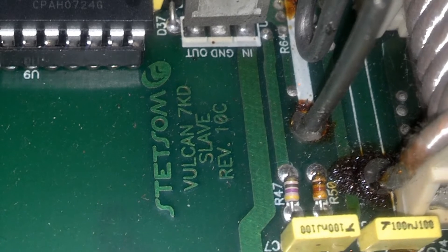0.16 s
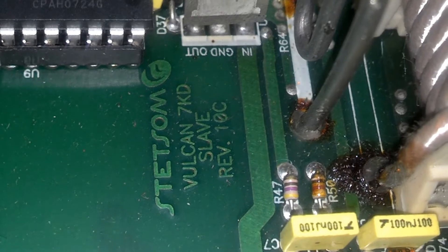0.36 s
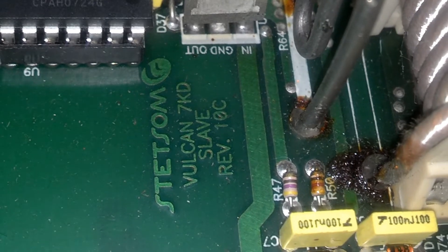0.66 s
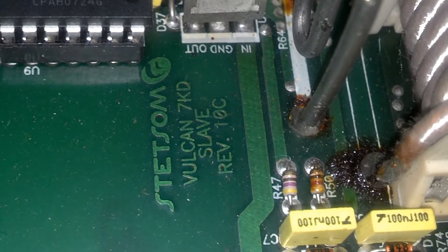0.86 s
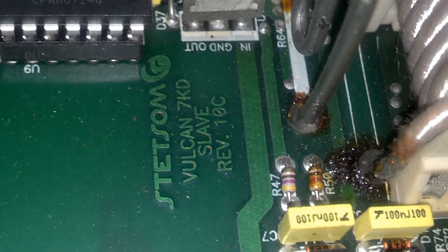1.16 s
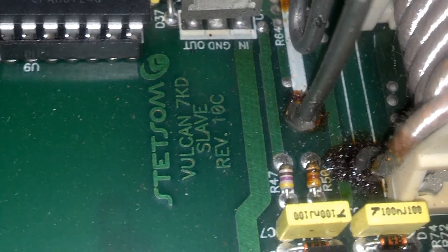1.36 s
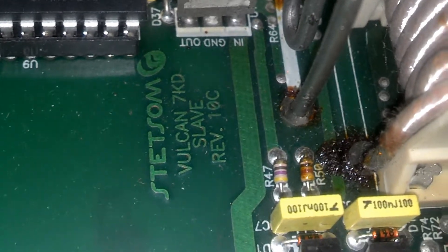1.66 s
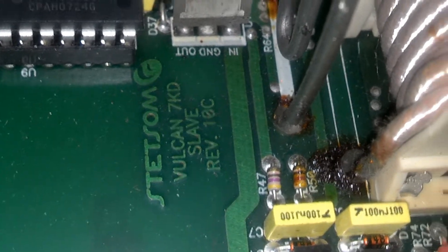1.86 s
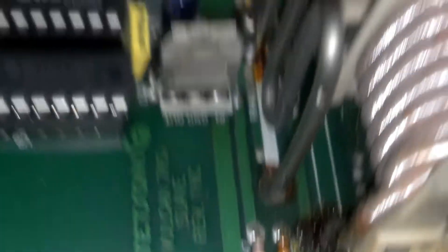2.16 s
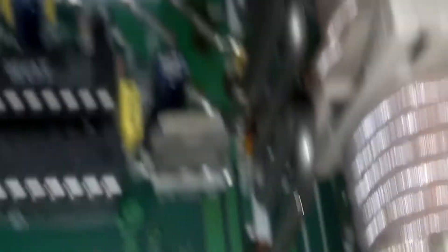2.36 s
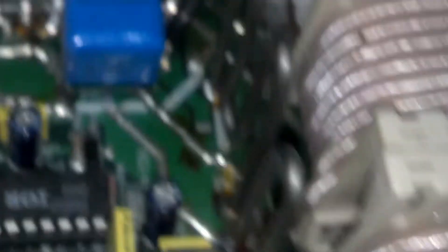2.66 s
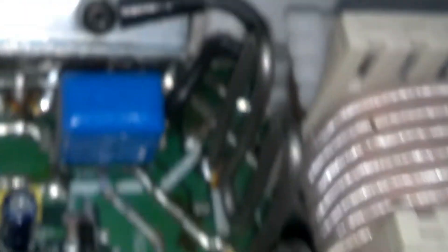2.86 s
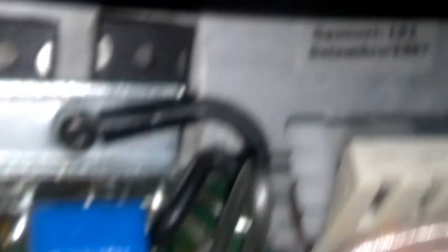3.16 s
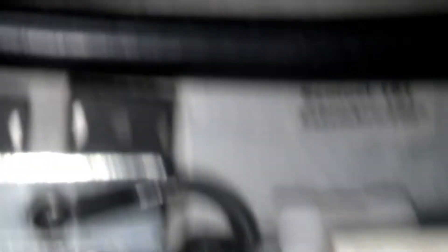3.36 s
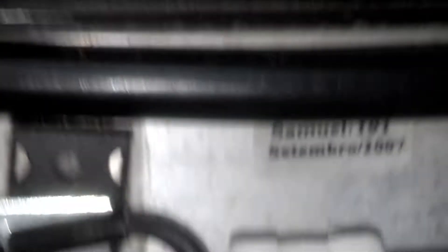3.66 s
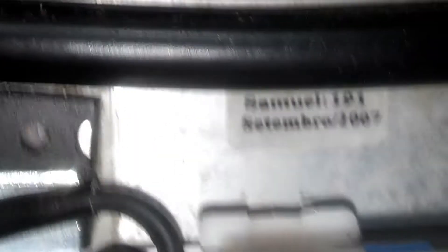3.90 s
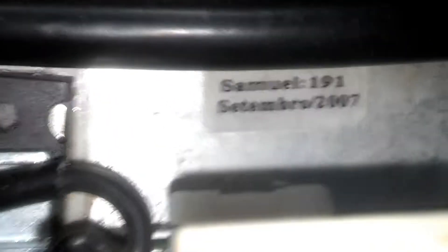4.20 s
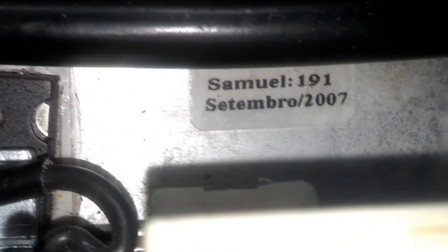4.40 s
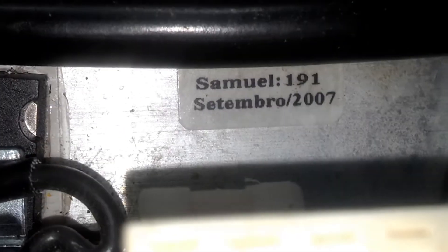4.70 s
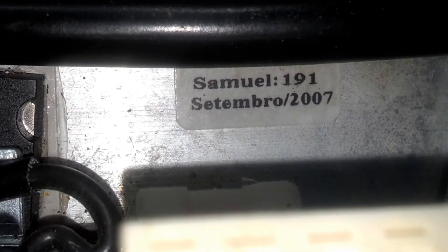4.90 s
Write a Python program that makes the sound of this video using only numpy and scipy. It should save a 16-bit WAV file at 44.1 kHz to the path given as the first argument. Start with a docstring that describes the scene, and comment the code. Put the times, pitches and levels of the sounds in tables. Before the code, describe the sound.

A steady low electrical hum and thin high whine indoors, with sharp handling clicks, soft thumps and brief finger rubs on a phone case.

```python
"""Workshop: a phone is held over a circuit board; a motor and a transformer hum, a switching supply whines.
Fingers tap and slide on the case. Air and rubbing are coloured noise; machines are wavering sines;
thumps, scrape grains and short rings are swelling, dying tone bursts; taps are noise bursts plus case
resonances. Two microphone ports are crossed into stereo, and a limiter ducks everything after the
loudest taps."""
import sys
import numpy as np
from scipy import signal
from scipy.fft import rfft, irfft, next_fast_len
from scipy.io import wavfile
from scipy.ndimage import uniform_filter1d

SR = 44100
rng = np.random.default_rng(int(sys.argv[2]) if len(sys.argv) > 2 else 0)


def store_wav(level_fs):
    """Save 16-bit WAV to argv[1]."""
    pcm = np.round(np.clip(np.atleast_2d(level_fs), -1, 1) * 32767)
    wavfile.write(sys.argv[1], SR, pcm.T.astype(np.int16))


N = 222345

# "common" is alike at both ports, "opposite" has opposite sign at each

# room air density re AIR_DB_PER_HZ: f/Hz, common level/dB, opposite level/dB
AIR_COLOUR = [(30, 6, 14), (60, -15, -9), (95, -1, -10), (149, 5.5, -4), (269, 9, -6), (396, 3, -5),
              (645, -9, -14), (790, -11, -13.5), (970, -17, -17.5), (1880, -20, -20.5), (3550, -22, -21),
              (5650, -28, -30), (6530, -17, -19), (9100, -23, -24.5), (15000, -24, -21.5),
              (14600, -27, -27), (15400, -67, -61)]
AIR_DB_PER_HZ = -80.5

# motor orders: multiple of shaft rate [1], common level/dB, opposite level/dB
MOTOR_ORDERS = [(6, -63, -78), (8, -69, -80), (9, -69, -80), (10, -73, -77), (11, -66, -82), (12, -66, -75),
                (13, -79, -86), (27, -88, -70), (56, -87, -92), (58, -77, -79), (59, -73.5, -86),
                (63, -85, -92), (64, -82, -90), (69, -82, -90), (72, -86, -92), (78, -91, -89)]
SHAFT_HZ = 58.73
# motor fade as the phone turns away, before the shares below: t/s, level/dB
FACING = [(0, -1), (.7, 0.5), (2.35, 1.5), (2.6, 1), (3.1, -4.5), (3.8, -5.5), (4.2, -2), (4.5, -2.5),
          (5.04, -6.5)]
FADE_SHARE_PER_ORDER, HUM_FADE_SHARE = 0.022, 0.38
# other steady tones: f/Hz, common level/dB, opposite level/dB
HUM_TONES = [(150, -63, -80), (180, -62, -80), (305, -63, -78), (240, -57, -75), (265.5, -49, -67),
             (398.3, -60, -73), (14828, -88, -86)]
# low drone: t/s, f/Hz, common level/dB
DRONE_TRACK = [(0, 119, -58), (1.6, 119, -62), (2.2, 118.3, -52), (2.9, 119.5, -57), (3.3, 125.5, -53),
               (3.7, 125, -45), (4.05, 124, -57), (4.42, 123.2, -44.5), (4.7, 124.2, -49),
               (5.04, 124.2, -48.5)]

# supply whine pitch: t/s, f/Hz
WHINE_PITCH = [(0, 6266), (.7, 6255), (1.33, 6284), (1.47, 6280), (1.505, 6470), (1.59, 6350), (1.62, 6310),
               (1.81, 6370), (1.85, 6270), (2.06, 6280), (2.35, 6390), (2.46, 6280), (2.7, 6310),
               (3.0, 6510), (3.35, 6650), (3.5, 6638), (3.72, 6150), (3.8, 6140), (3.92, 6300),
               (3.95, 6460), (4.04, 6610), (4.2, 6650), (4.27, 6750), (4.39, 6780), (4.43, 6780),
               (4.52, 6760), (4.57, 6690), (4.79, 6720), (4.82, 6470), (4.96, 6540), (5.04, 6590)]
# whine level on top of its rise with pitch: t/s, level/dB
WHINE_SWELL = [(0, -1.5), (3.0, -1.5), (3.55, 1), (3.75, -2), (3.9, 1), (4.3, -1), (4.55, 0), (4.65, -3),
               (4.9, -0.5), (5.04, -1.5)]
WHINE_REST_HZ, WHINE_REST_DB, WHINE_DB_PER_KHZ = 6243, -59, 14.5
WHINE_TREMBLE_HZ, WHINE_JITTER_HZ, TREMBLE_PER_KHZ = 22.17, 50.73, 0.41  # first two: at rest pitch
SKIRT_ABOVE_HZ, SKIRT_SPREAD_HZ, SKIRT_REL_DB = 280, 330, -12.5
FAINT_HZ, FAINT_DB = 8130, -75.5

# soft hand bumps beside port one: t/s, peak level/dB, f/Hz
BUMPS = [(0.335, -30.5, 218), (1.419, -29, 200), (1.458, -31, 200), (1.471, -30.5, 204), (1.483, -35, 129),
         (2.1398, -19, 310), (2.21, -28, 274), (2.383, -26.5, 330), (2.4974, -12, 432), (3.01, -22.5, 300),
         (3.046, -34, 122), (3.27, -16.5, 123), (3.529, -12.5, 407), (3.54, -19, 443), (3.928, -33, 130),
         (3.9592, -37, 128.6), (3.97, -37, 327), (4.1079, -38, 318), (4.2648, -27, 340),
         (4.2712, -29.5, 490)]
BUMP_SWELL_CYCLES, BUMP_FAR_REL_DB = 0.69, -25
# faint bumps at chance moments
FIDGET_PER_S, FIDGET_MIN_DB, FIDGET_MIN_HZ, FIDGET_OCTAVES = 1.2, -30, 123, 1.03
# thumps, scrape grains and short rings: t/s, port one peak level/dB, port two peak level/dB, f/Hz,
# swell/cycles
TONE_BURSTS = [(0.1729, -29, -28.5, 373, 0.25), (0.674, -40, -41, 3420, 2.5),
               (0.6744, -37, -32.5, 470, 0.95), (0.6799, -25.5, -22.5, 410, 0.71),
               (.9572, -53, -51, 1650, 2.2), (.9662, -51, -51, 1730, 3.3), (2.3811, -21, -43, 510, 0.75),
               (2.999, -39, -41, 800, 0.58), (2.4943, -41, -1, 7540, 0.75),
               (2.4949, -42, -13.5, 2960, 0.33), (2.4951, -35, -14.5, 990, 0.73),
               (2.701, -32, -33, 940, 0.8), (3.262, -21, -43, 330, 0.55), (3.2651, -10, -36, 319, 0.62),
               (3.2675, -27, -43, 486, 0.95), (3.2734, -32, -56, 500, 0.83), (3.9856, -29, -37, 694, 0.49),
               (4.0052, -40, -32, 906, 3.2), (4.017, -33, -35, 900, 2.07), (4.038, -36, -37, 1050, 2.2),
               (4.0595, -30, -31, 750, 0.67), (4.0646, -32, -32, 708, 0.83), (4.172, -48, -40, 1290, 0.84),
               (4.2667, -46, -40, 4270, 2.5), (4.173, -46, -34.5, 4140, 2.8),
               (4.5944, -46, -25, 4380, 0.57), (4.595, -30, -11.5, 1340, 0.38),
               (4.5949, -23, -14.5, 443, 0.55), (4.5985, -23, -16, 149.6, 0.61)]

# nail ticks and scuffs: t/s, port one peak level/dB, port two peak level/dB, colour f/Hz, rise/ms,
# case ring level/dB re crack
TICKS = [(0.171, -49, -45, 2200, 0.53, -15), (0.3937, -48, -40, 9400, 0.42, -31.5),
         (0.679, -22, -15, 3170, 0.67, 13.5), (0.9567, -48, -48, 2000, 0.73, -6),
         (0.9654, -45, -45, 2300, 0.72, -2), (2.38, -60, -32.5, 2150, 1.4, -33),
         (2.4942, -27.5, -21, 6350, 2.07, -32), (3.2639, -33, -59, 2130, 3, -35),
         (4.143, -65, -36.5, 6000, 6.8, -35), (4.171, -53, -26.5, 7000, 2.16, -27),
         (4.265, -47, -26, 6260, 1.4, -35), (4.2685, -50, -35, 7500, 1.0, -35),
         (4.596, -47, -29.5, 2370, 0.44, -35)]
# case resonances: f/Hz, level/dB, t60/s
CASE_MODES = [(470, -19, 0.013), (1815, -7.5, 0.02), (1680, -43, 0.1), (1733, -32, 0.15), (1774, -34, 0.16),
              (3600, -9.5, 0.011), (4090, 2.5, 0.0065), (4000, -40, 0.13), (4240, -39, 0.11)]
RATTLE_GAIN, RATTLE_DECAY_S = 0.26, 0.015

# skin on the case, noise colour: f/Hz, common level/dB, opposite level/dB
SKIN_COLOUR = [(100, 3.5, 2.5), (365, 11, 7), (644, 6, 5), (960, 4, -1), (1350, 1, -1), (1700, -5, -5.5),
               (3360, -5.5, -4.5), (5850, -4, -4.5), (8300, -7, -6), (10940, -10, -11.5),
               (15300, -15.5, -14), (15900, -45, -47)]
# rubbing noise: finger strokes, and the noisy tail of the loud snap at 2.5 s: full at t/s,
# swell before it/s, length/s, hiss level/dB, scrape level/dB, rumble level/dB, level change over length/dB
RUBS = [(2.499, 0.002, 0.0077, -33, -36, -34.5, -2.5), (2.524, 0.012, 0.016, -38, -38.5, -43, -9.5),
        (2.549, 0.014, 0.15, -44, -44, -46.5, -9.5), (2.708, .003, 0.028, -54, -46, -47, -8),
        (2.759, 0.076, 0.12, -40.5, -41.5, -44, -11), (2.929, 0.053, 0.044, -47, -48.5, -48.5, -1),
        (3, 0.02, 0.052, -40, -45.5, -42, -1), (3.398, 0.027, 0.11, -45.5, -52, -47.5, 4.5),
        (3.535, 0.019, 0.029, -37.5, -48.5, -37.5, 0), (3.597, 0.042, 0.05, -38.5, -46, -40, 0.5),
        (3.659, 0.018, 0.035, -41.5, -48, -41, -2), (3.776, 0.11, 0.047, -48, -56.5, -46, -4),
        (3.838, .02, .14, -64, -67, -59, 6.5), (4, 0.018, 0.056, -48, -48, -44.5, 3),
        (4.079, .02, 0.26, -61, -66, -54.5, -1)]
RUB_FALL_S = 0.025
GRIT_PER_S, GRIT_DECAY_MS = 160, 1.8
GRIT_MIN_DB, GRIT_SCATTER_DB = -17, 2.5  # catches over the even rub

PORT_LAG_SAMPLES, CROSS_GAIN = 17, 0.74
BASS_CUT_HZ, TOP_HZ = 54, 16050
LIMIT_DB, RELEASE_DB_PER_S, SLOPE = -13, 8.5, 1.0  # SLOPE: dB of cut per dB over


def amp(db):
    """dB to gain."""
    return 10 ** (np.asarray(db) / 20)


def curves(table):
    """Columns of a time table, interpolated to one value a sample."""
    t_s, *columns = np.transpose(table)
    return [np.interp(np.arange(N) / SR, t_s, c) for c in columns]


def walk(rate_hz):
    """Random levels held 1 / rate_hz and slewed twice; spread near 1."""
    hold = int(SR / rate_hz)
    steps = np.repeat(rng.standard_normal(N // hold + 1), hold)
    return 1.236 * uniform_filter1d(uniform_filter1d(steps, hold), hold)[:N]


def ports(common, opposite):
    """The two microphone ports from their common and opposite parts."""
    return np.array([common + opposite, common - opposite])


def bands(colour, edges_hz):
    """Coloured noise at both ports, cut into soft-edged bands."""
    size = next_fast_len(N)
    log_f = np.log(np.arange(1, size // 2 + 2) * SR / size)
    hz, *parts_db = np.transpose(colour)
    white = rfft(rng.standard_normal((2, size))) * np.sqrt(SR / 2)
    pair = ports(*(w * amp(np.interp(log_f, np.log(hz), db)) for w, db in zip(white, parts_db)))
    below = [np.clip((np.log(e) - log_f) / 0.29 + .5, 0, 1) for e in edges_hz]
    return [irfft(pair * (hi - lo), size)[:, :N] for lo, hi in zip([0] + below, below + [1])]


def tone(hz, common_db, opposite_db, waver_db=2.0):
    """A wavering line; the opposite part runs a quarter cycle off, as from a path difference."""
    phase = 2 * np.pi * (np.cumsum(np.broadcast_to(hz, N)) / SR + rng.random())
    pair = ports(amp(common_db) * np.sin(phase), -amp(opposite_db) * np.cos(phase))
    return np.sqrt(2) * amp(waver_db * walk(5.114)) * pair


def add(out, sound, t_s, one_db, two_db):
    """Lays a short sound, scaled to its peak, on both ports."""
    i = int(t_s * SR)
    out[:, i:i + len(sound)] += amp([[one_db], [two_db]]) * sound / np.abs(sound).max()


def air():
    """Room noise: bands swell together and flicker alone."""
    swell = walk(0.51)
    edges_hz = list(70 * 2 ** np.arange(0, 7.6, .75))
    noise = sum(amp(0.043 * swell + 1.0 * walk(11)) * b for b in bands(AIR_COLOUR, edges_hz))
    return amp(AIR_DB_PER_HZ) * noise


def motor():
    """Multiples of the shaft rate; turning away dims the high orders most."""
    (facing_db,) = curves(FACING)
    return sum(amp(facing_db * FADE_SHARE_PER_ORDER * order)
               * tone(order * SHAFT_HZ, common_db, opposite_db, waver_db=2.4)
               for order, common_db, opposite_db in MOTOR_ORDERS)


def hum():
    """Transformer hum and other steady tones, following part of the motor's fade."""
    (facing_db,) = curves(FACING)
    return amp(HUM_FADE_SHARE * facing_db) * sum(tone(*line) for line in HUM_TONES)


def drone():
    """One low tone of wandering pitch, nearly alike at both ports."""
    hz, db = curves(DRONE_TRACK)
    return tone(hz + 1.191 * walk(4), db, db - 25)


def whine():
    """Free-running oscillator, louder and shakier as it climbs; hissy skirt and faint whistle above."""
    (hz,), (swell_db,) = curves(WHINE_PITCH), curves(WHINE_SWELL)
    climb_khz = (hz - WHINE_REST_HZ) / 1000
    db = WHINE_REST_DB + WHINE_DB_PER_KHZ * climb_khz + swell_db

    skirt_hz = hz + SKIRT_ABOVE_HZ + SKIRT_SPREAD_HZ * walk(700)
    skirt_db = db + SKIRT_REL_DB
    skirt = amp(3.5 * walk(900)) * tone(skirt_hz, skirt_db, skirt_db + 3)

    shake_hz = WHINE_TREMBLE_HZ * walk(90) + WHINE_JITTER_HZ * walk(500)
    line_hz = hz + (1 + TREMBLE_PER_KHZ * climb_khz) * shake_hz
    line = amp(0.51 * walk(200)) * tone(line_hz, db, db - 8.0, waver_db=0.5)

    faint = tone(FAINT_HZ + 30 * walk(200), FAINT_DB, FAINT_DB)
    return line + skirt + faint


def fidgets():
    """Rows like BUMPS at chance times, levels and pitches."""
    chance = rng.random((int(FIDGET_PER_S * N / SR), 3))
    return [(0.07 + when * (N / SR - .3), FIDGET_MIN_DB + 5 * size,
             FIDGET_MIN_HZ * 2 ** (FIDGET_OCTAVES * pitch)) for when, size, pitch in chance]


def tone_bursts():
    """Bumps, thumps, scrape grains and short rings: a short swelling and dying tone burst each."""
    out, t = np.zeros((2, N)), np.arange(SR // 12) / SR
    bumps = [(t_s, db, db + BUMP_FAR_REL_DB, hz, BUMP_SWELL_CYCLES)
             for t_s, db, hz in BUMPS + fidgets()]
    for t_s, one_db, two_db, hz, swell_cycles in bumps + TONE_BURSTS:
        rise_s = max(swell_cycles, .1) / hz
        envelope = (t / rise_s) ** 2 * np.exp(-2 * t / rise_s)
        burst = envelope * np.cos(2 * np.pi * hz * (t - rise_s))
        add(out, burst, t_s - rise_s, one_db, two_db)
    return out


def taps():
    """Ticks crack as band-passed noise bursts and ring the case's decaying modes."""
    out, t = np.zeros((2, N)), np.arange(SR // 12) / SR
    modes = sum(amp(db) * np.sin(2 * np.pi * hz * t) * 1000 ** (-t / t60_s) for hz, db, t60_s in CASE_MODES)
    ring = modes * (1 - np.exp(-t / 0.00025)) ** 2  # soft onset
    noises = rng.standard_normal((len(TICKS), len(t)))
    for (t_s, one_db, two_db, hz, rise_ms, ring_db), noise in zip(TICKS, noises):
        rise_s = rise_ms / 1000
        band_hz = [hz / 3.6, min(hz * 1.75, .4 * SR)]
        colour = signal.butter(3, band_hz, "band", fs=SR, output="sos")
        burst = t / rise_s * np.exp(1 - t / rise_s)
        rattle = RATTLE_GAIN * np.minimum(t / rise_s, 1) * np.exp(-t / RATTLE_DECAY_S)
        crack = signal.sosfilt(colour, noise * (burst + rattle))
        add(out, crack / np.abs(crack).max() + amp(ring_db) * ring, t_s - rise_s, one_db, two_db)
    return out


def grit():
    """Gain that jumps at each chance catch of the skin and dies in a few ms."""
    catch_db = GRIT_MIN_DB + GRIT_SCATTER_DB * np.minimum(rng.exponential(size=N), 3)
    catch = (rng.random(N) < GRIT_PER_S / SR) * amp(catch_db)
    return 1 + signal.lfilter([1], [1, -np.exp(-1000 / GRIT_DECAY_MS / SR)], catch)


def rubbing():
    """Skin sticks and slips, and a snap trails off: three noise bands, the lower two roughened by grit."""
    rumble, scrape, hiss = (b / b.std() for b in bands(SKIN_COLOUR, [760, 1650]))
    t, power = np.arange(N) / SR, np.zeros((3, N))
    for t_s, swell_s, length_s, *band_db, change_db in RUBS:
        knots_s = [-max(swell_s, .002), 0, length_s, length_s + RUB_FALL_S]
        envelope = np.interp(t - t_s, knots_s, [0, 1, 1, 0])
        drift_db = change_db * np.clip((t - t_s) / length_s, 0, 1)
        power += (envelope * amp(np.c_[band_db] + drift_db)) ** 2
    hiss_gain, scrape_gain, rumble_gain = np.sqrt(power)

    flicker = amp(1.0 * walk(50) + 1.5 * walk(600))  # shared by all bands
    hiss = amp(1.9 * walk(35)) * hiss_gain * hiss
    scrape = amp(1.1 * walk(150)) * scrape_gain * scrape
    rumble = amp(2.2 * walk(90)) * rumble_gain * rumble
    return flicker * (hiss + grit() * (scrape + rumble))


def scene():
    """Sum of all sources at the two ports."""
    return air() + motor() + hum() + drone() + whine() + tone_bursts() + taps() + rubbing()


def record(dry):
    """Each side is one port minus the other, delayed; slow-release peak limiter; steep top cut."""
    dry = signal.sosfilt(signal.butter(3, BASS_CUT_HZ, "high", fs=SR, output="sos"), dry)
    other = np.pad(dry[::-1], ((0, 0), (PORT_LAG_SAMPLES, 0)))[:, :N]
    wet = dry - CROSS_GAIN * other

    peak_db = 20 * np.log10(np.abs(wet).max(axis=0) + 1e-9)
    over_db = np.maximum(peak_db - LIMIT_DB, 0)
    # the cut jumps to each overshoot and falls back at a steady dB rate
    ramp_db = RELEASE_DB_PER_S * np.arange(N) / SR
    cut_db = SLOPE * (np.maximum.accumulate(over_db + ramp_db) - ramp_db)
    # acts 60 samples late, smoothed over about 130
    late_db = signal.lfilter([1 / 130], [1, 1 / 130 - 1], np.pad(cut_db, (60, 0))[:N])

    top_cut = signal.ellip(10, .2, 70, TOP_HZ, fs=SR, output="sos")
    return signal.sosfilt(top_cut, wet * amp(-late_db))


dry = scene()
out = record(dry)
store_wav(out)
```